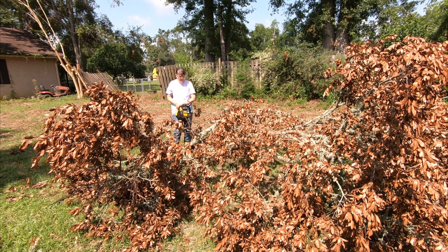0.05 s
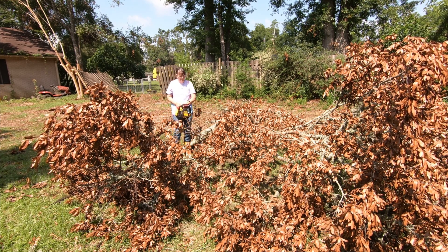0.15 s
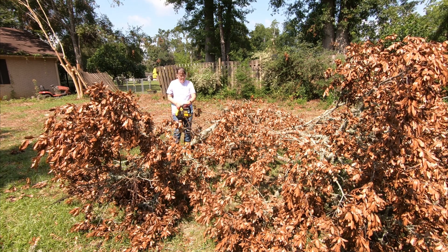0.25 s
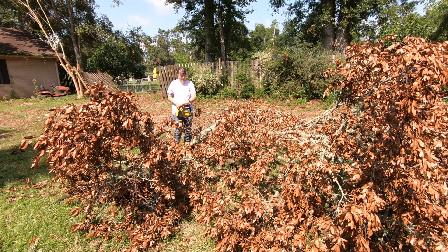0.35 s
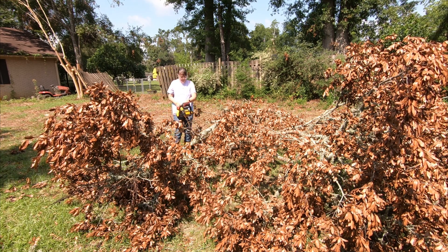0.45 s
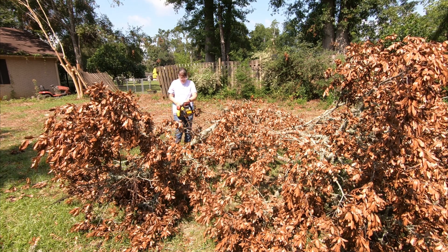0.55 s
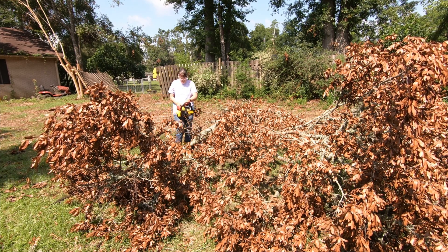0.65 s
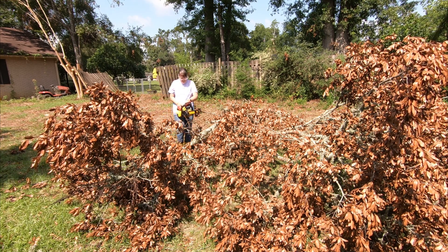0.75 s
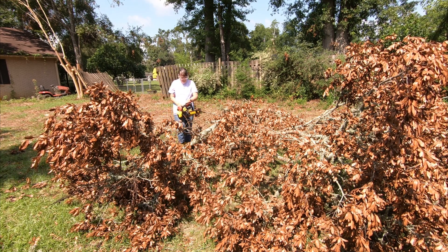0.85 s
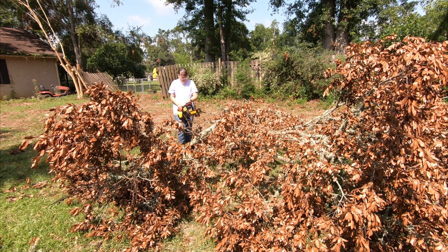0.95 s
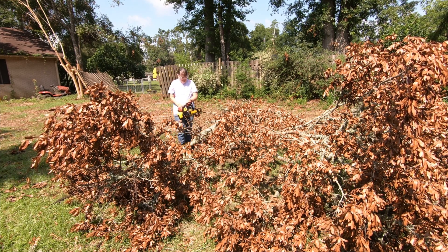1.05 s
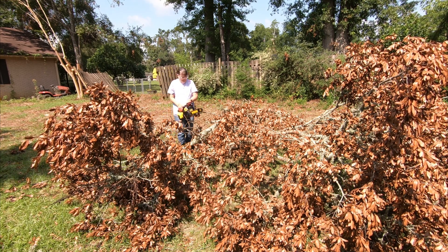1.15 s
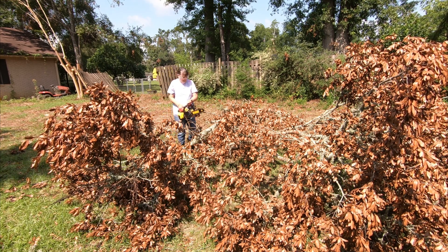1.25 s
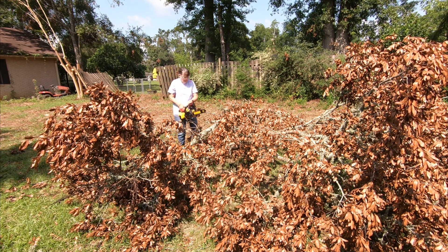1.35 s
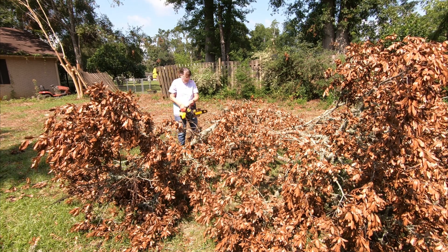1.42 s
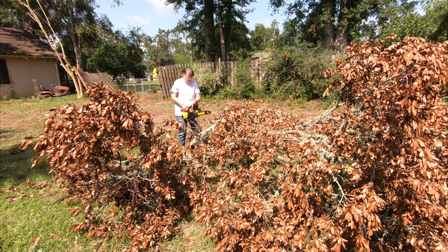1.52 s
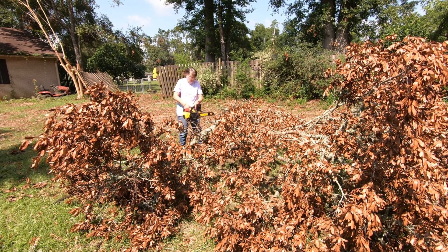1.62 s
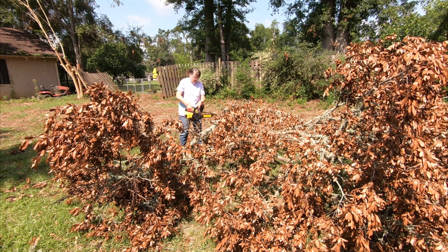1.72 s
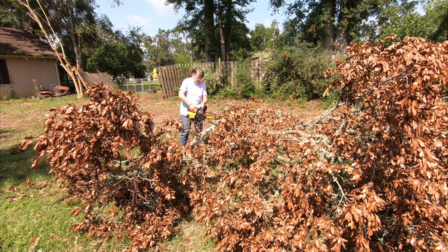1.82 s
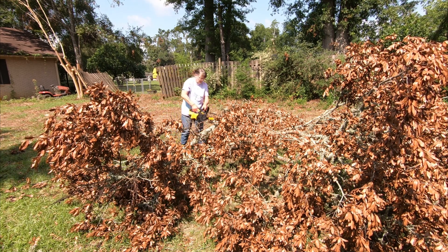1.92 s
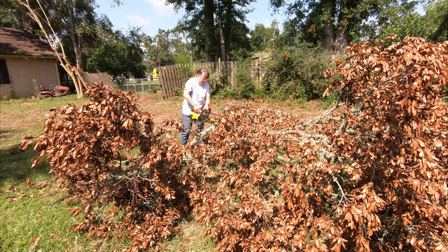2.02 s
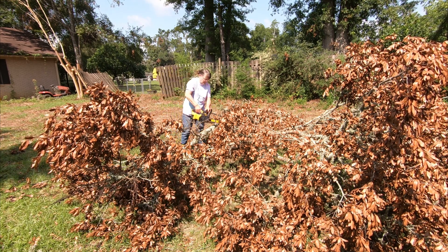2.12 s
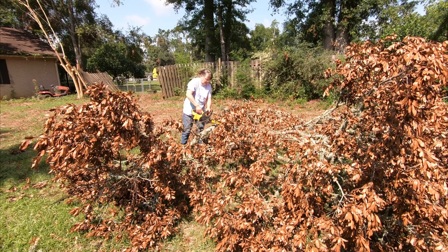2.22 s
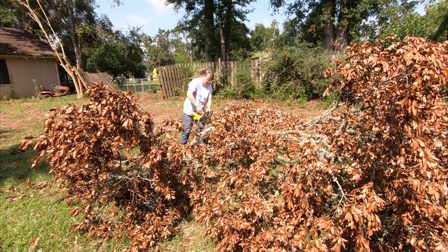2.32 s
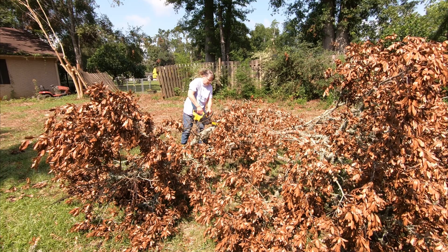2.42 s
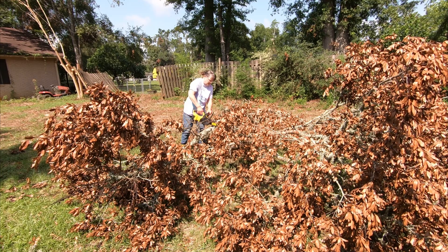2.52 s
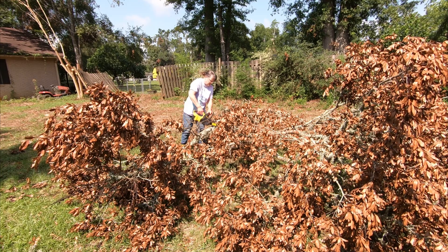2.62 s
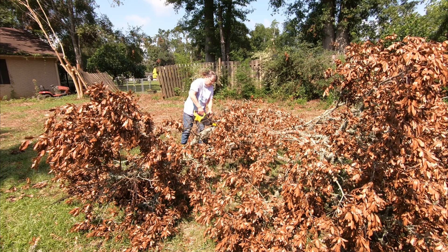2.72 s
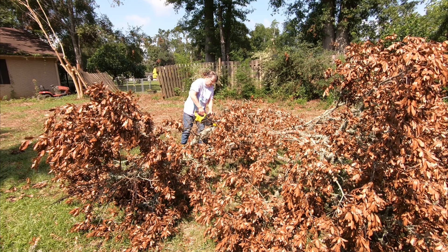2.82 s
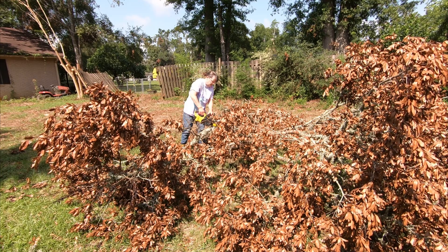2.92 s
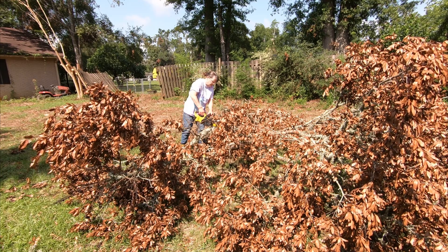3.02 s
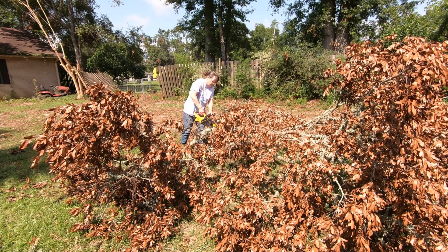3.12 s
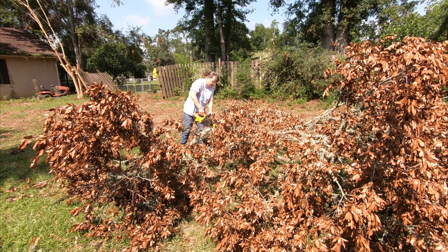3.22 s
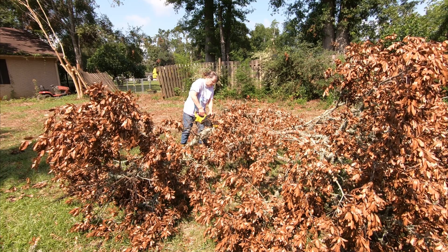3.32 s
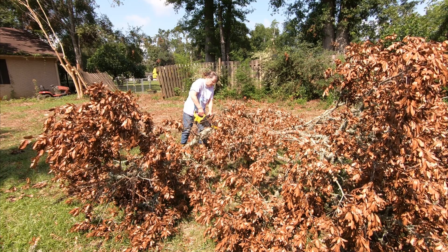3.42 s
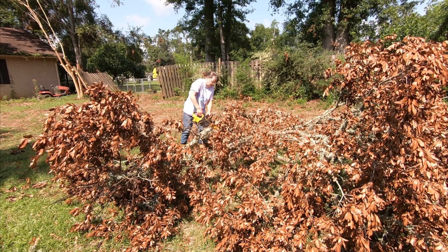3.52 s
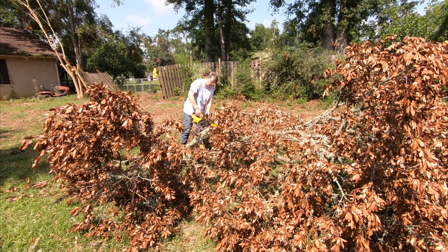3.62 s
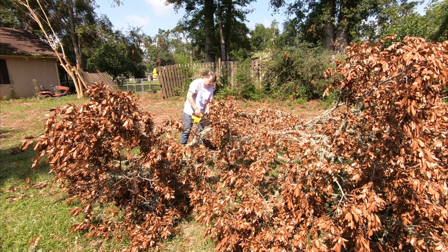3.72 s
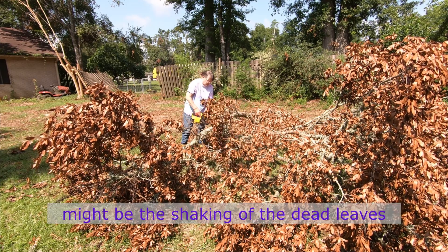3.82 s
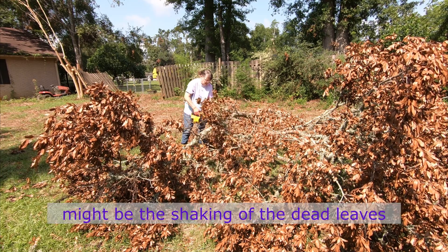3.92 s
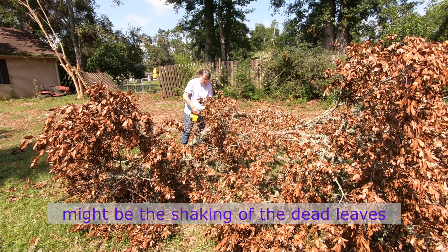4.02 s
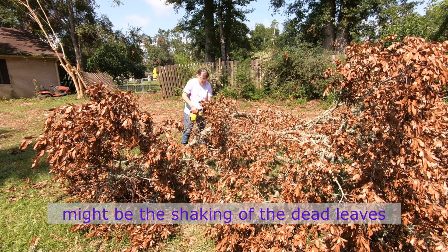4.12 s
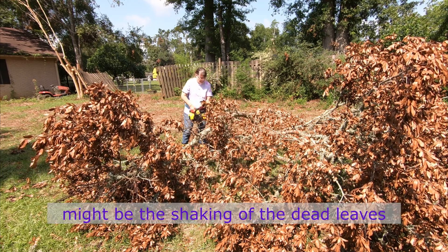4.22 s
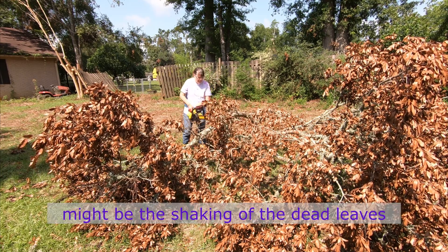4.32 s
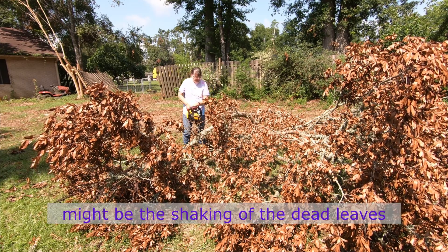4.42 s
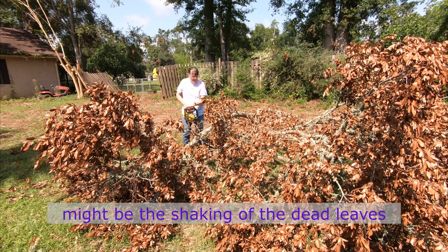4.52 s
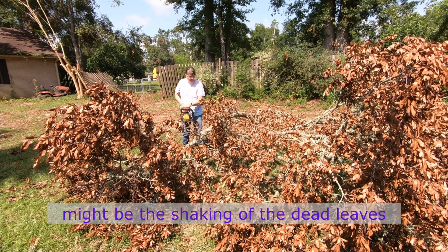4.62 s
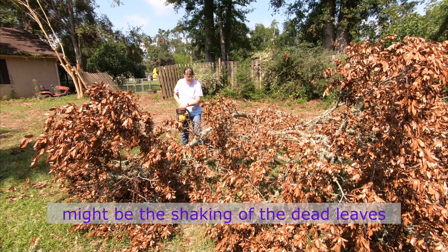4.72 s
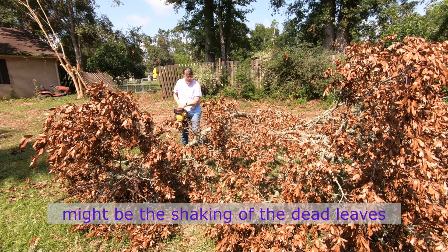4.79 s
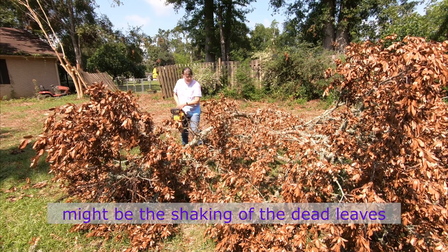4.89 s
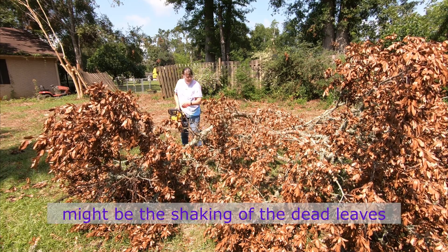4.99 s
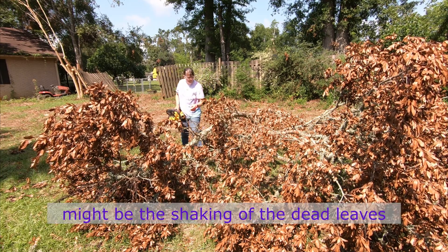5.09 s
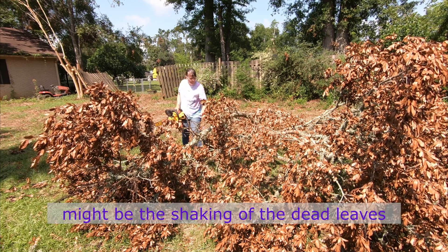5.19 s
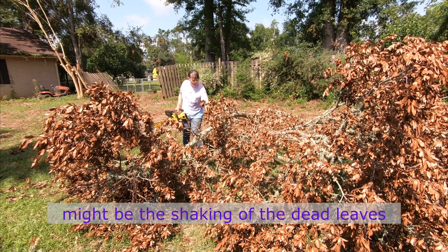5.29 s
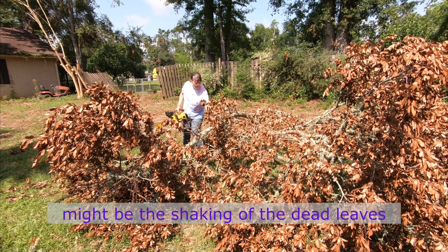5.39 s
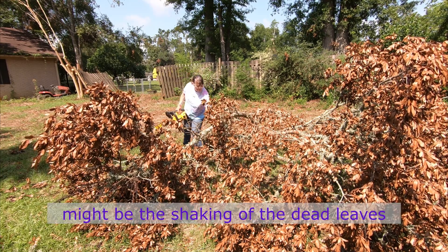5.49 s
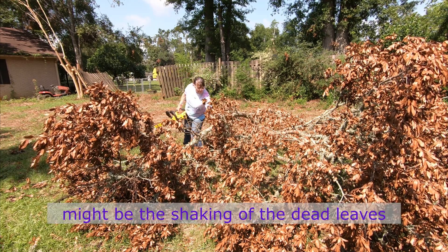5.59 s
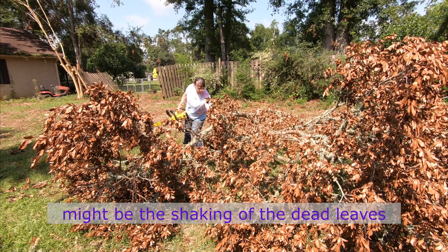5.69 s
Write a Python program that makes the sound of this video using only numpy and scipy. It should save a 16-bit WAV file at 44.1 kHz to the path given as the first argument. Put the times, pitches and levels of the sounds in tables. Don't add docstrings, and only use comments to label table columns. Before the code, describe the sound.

Outdoor yard with low far traffic rumble, soft treetop hiss, a high katydid buzz and thin cricket tones. Dry leaves rustle briefly, a trigger clicks, and an electric chainsaw jerks and whirs up to a rattling whine. Thin dead branches crack sharply as it cuts, then the brake scrapes it quickly down. A bird whistles afterwards with faint echoes. Stereo camera microphone at a moderate distance.

```python
import sys
import numpy as np
from scipy import signal
from scipy.fft import rfft, irfft, next_fast_len
from scipy.io import wavfile
from scipy.ndimage import uniform_filter1d, map_coordinates

SR = 44100
rng = np.random.default_rng(int(sys.argv[2]) if len(sys.argv) > 2 else 0)


def elevation(decibels):
    levels = np.asarray(decibels, float)
    return 10 ** (levels / 20)


def wrap_up_sound(samples):
    columns = np.atleast_2d(samples).T
    tamed = np.clip(columns, -1, 1)
    steps = np.round(tamed * 32767).astype(np.int16)
    wavfile.write(sys.argv[1], SR, steps)


N = 253575

# (frequency [Hz], likeness [0-1])
YARD_ALIKE = [(60, 0.98), (130, 1), (290, 0.87), (640, 0.78), (1400, 0.65), (3090, 0.72), (6780, 0.19),
              (14900, 0.39)]
# (frequency [Hz], likeness [0-1])
SAW_ALIKE = [(60, 0.88), (130, 0.91), (290, 0.92), (640, 1), (1400, 0.65), (3090, 0.95), (4700, 1),
             (6780, 0.61), (14900, 0.21)]
# (time [s], load [0-1])
LOAD = [(1.4, 0.54), (1.9, 0.74), (2.65, 0.01), (2.85, 0.71), (3.1, 0.99), (3.42, 0.88), (3.5, 0.36),
        (3.9, 0.34)]
# (time [s], drive-link rate [Hz])
BRAKE = [(3.69, 390), (3.79, 278), (3.9, 168), (4.0, 86), (4.11, 40), (4.24, 10)]
FULL_HZ = 386


def unit(x):
    return x / np.sqrt(np.mean(x ** 2) + 1e-20)


def along(points, hz):
    f, v = np.transpose(points)
    return np.interp(np.log(hz + 1), np.log(f + 1), v)


def curves(rows):
    s, *cols = np.transpose(rows)
    return [np.interp(np.arange(N) / SR, s, c) for c in cols]


def bumps(rows):
    t = np.arange(N) / SR
    return sum(height * np.exp(-2 * ((t - s) / width) ** 2) for s, height, width in rows)


def wobble(rate):
    knots = rng.standard_normal(int(N * rate / SR) + 4)
    return map_coordinates(knots, [np.arange(N) * rate / SR])


def filtered(x, response):
    m = next_fast_len(N + 8192)
    return irfft(rfft(x, m) * response(np.fft.rfftfreq(m, 1 / SR)), m)[..., :N]


def resonances(modes, f):
    return sum(elevation(db) * 1j * f * w / (c * c - f * f + 1j * f * w) for c, w, db in modes)


def ports(x, left_db, lead=((0, 0), (1, 0))):
    def half(hz):
        return elevation(along(left_db, hz) / 2) * np.exp(.5j * along(lead, hz))
    return filtered(x, lambda hz: np.array([half(hz), 1 / half(hz)]))


def rush(spectrum, alike, gate=1, patchy_db=0):
    z = signal.stft(gate * rng.standard_normal((2, N)), nperseg=256)[2]
    field = uniform_filter1d(rng.standard_normal(z.shape[1:]), size=3, axis=0)
    field = uniform_filter1d(field, size=8, axis=1)
    pair = signal.istft(z * elevation(patchy_db * unit(field)), nperseg=256)[1][:, :N]

    def colour(hz):
        turn = np.arccos(np.clip(along(alike, hz), 0, 1) ** 0.94) / 2
        return elevation(along(spectrum, hz)) * [np.cos(turn), np.sin(turn)]
    mid, side = filtered(pair, colour)
    return unit(np.array([mid + side, mid - side]))


def traffic():
    # (frequency [Hz], density [dB per Hz])
    rumble_band = [(12, -61), (20, -20), (45, -12.5), (58, 1.5), (75, -0.5), (108, -6), (130, -8),
                   (170, -23.5), (290, -120)]
    drone_band = [(71, -16), (120, 2), (204, -3.5), (242, -12.5), (270, -17), (350, -24.5), (590, -120)]
    canopy_band = [(1470, -35), (2500, -4), (3680, -9), (3870, -4), (4730, -4), (5030, -5.5), (5140, -5),
                   (6390, -14.5), (8080, -18.5), (9500, -7.5), (10700, -13), (11300, -58), (20900, -120)]
    roar_band = [(150, -38), (250, -13), (295, -12.5), (333, -15), (464, -13), (501, -12.5), (661, -3),
                 (900, -1), (2510, -22), (3500, -29.5), (4550, -59), (7700, -120)]
    # (time [s], level [dB])
    road = [(0, -0.5), (.5, 1), (1.4, 2), (2.4, 0), (3.2, 1.5), (4.2, 1), (5.15, 4), (5.75, 3)]
    # (time [s], level over the rumble [dB], half width [s])
    surges = [(0.05, 4, 0.47), (.63, 9, 0.041), (.86, 5.5, 0.09), (1.15, 7, 0.14), (1.88, 7, 0.18),
              (2.4, 5.5, 1), (4.05, 6, 0.16), (4.85, 2.5, 0.17), (5.3, 3, 0.48)]
    # (time [s], level [dB], half width [s])
    breeze = [
        (4.3, 0.5, 0.16),
        (5.2, -2.5, 1),
    ]
    near_db, = curves(road)
    rumble = elevation(-46.5 + bumps(surges) + 0.34 * wobble(6.3)) * rush(rumble_band, YARD_ALIKE)
    drone = elevation(-52 + 2.18 * near_db + 0.65 * wobble(5.0)) * rush(drone_band, YARD_ALIKE)
    hiss = elevation(-58.5 + bumps(breeze) + 0.23 * wobble(8.2)) * rush(canopy_band, YARD_ALIKE)
    roar = elevation(-47 + near_db + 0.048 * wobble(15)) * rush(roar_band, YARD_ALIKE)
    return rumble + drone + hiss + roar


def insects():
    # (frequency [Hz], density [dB per Hz])
    katydid = [(7500, -70), (8800, -39), (9600, -4), (10100, 9), (10350, 6), (10600, -23), (11100, -49),
               (13200, -60), (13600, -18), (13900, -5), (14300, -24), (14700, -72)]
    # (frequency [Hz], level [dB rms])
    crickets = [(4610, -72), (4762, -71), (4937, -85), (5200, -75)]
    t = np.arange(N) / SR
    stroke = (69 * t + 0.16 * wobble(2.36)) % 1
    teeth = np.sin(np.pi * stroke) ** 2 * (1 + .5 * np.cos(6 * np.pi * stroke))
    buzz = rush(katydid, [(9000, 0.18)], (.45 + teeth) * elevation(wobble(5)))
    ring = 0
    for hz, db in crickets:
        ring = ring + elevation(db + 2.3 * wobble(7.4)) * np.sin(2 * np.pi * hz * t + 1.6 * wobble(40))
    return elevation(-63.5) * buzz + ring


def leaves():
    # (time [s], length [s], level [dB rms], centre [Hz])
    puffs = [(0.018, 0.047, -54.5, 2500), (0.726, 0.036, -65, 7040), (0.982, 0.098, -58, 4020),
             (4.17, 0.51, -64, 5630), (4.51, 0.13, -62, 4560), (5.153, 0.12, -53.5, 4260),
             (5.676, 0.17, -59, 4600)]
    t, out = np.arange(N) / SR, 0
    for s, length, db, hz in puffs:
        band = [(hz / 3, -30), (hz * 0.69, -3), (hz * 1.2, 0), (hz * 2.1, -30), (hz * 2.1, -90)]
        grains = rush(band, YARD_ALIKE, elevation(3 * wobble(250)))
        out = out + elevation(db) * np.exp(-((t - s) / length * 2) ** 2) * grains
    return out


def ticks():
    # (time [s], peak [dB], centre [Hz], t60 [s])
    clicks = [(0.9951, -42, 4610, 0.011), (1.1882, -43, 3480, 0.014), (1.4065, -19.5, 3540, 0.005),
              (1.407, -26, 4730, 0.0079), (1.4068, -39, 8300, 0.0059), (1.4445, -31, 3600, 0.012),
              (1.445, -34, 4740, .01), (1.483, -32, 3160, 0.015), (1.488, -31, 990, 0.014),
              (1.6217, -38, 2770, 0.0074), (4.022, -26, 4070, 0.0092), (4.066, -34, 5330, 0.011),
              (4.09, -39, 3550, 0.027), (4.135, -43, 4040, 0.011), (3.829, -16, 3770, 0.011),
              (3.888, -27, 5030, .008), (3.929, -23, 3000, .008), (4.0805, -33, 705, 0.02),
              (4.081, -34, 1420, .025), (4.555, -42, 4960, .012), (4.5855, -52, 4550, .01),
              (4.6254, -43, 5010, 0.011), (4.6787, -49, 5000, .01), (4.9302, -50, 4390, .01),
              (5.636, -47, 4560, .01), (5.1547, -52, 2560, 0.011)]
    # (time [s], peak [dB], centre [Hz],
    # t60 [s])
    snaps = [(2.327, -14, 3520, .01), (2.692, -10.5, 687.3, 0.011), (2.809, -31, 1100, 0.023),
             (2.907, -19, 890, 0.023), (2.907, -12, 3800, 0.0089), (2.974, -15.5, 1203, 0.029),
             (2.976, -18, 2275, 0.017), (2.982, -20, 714, .02), (3.029, -17, 1150, 0.021),
             (3.059, -13, 737, 0.02), (3.061, -18, 1950, 0.022), (3.099, -10.5, 1160, 0.013),
             (3.119, -11.5, 800, 0.015), (3.167, -18, 1301, 0.023), (3.27, -18, 1742, 0.022),
             (3.308, -14.5, 874, 0.025), (3.308, -9, 3300, 0.011), (3.344, -11, 1100, 0.014),
             (3.354, -20, 3450, 0.0095), (3.363, -20, 764, 0.037), (3.363, -11.5, 3940, 0.017),
             (3.383, -10.5, 730, 0.02), (3.437, -14, 1360, 0.024), (3.594, -10, 4596, 0.0086),
             (4.083, -39, 1957, 0.024)]
    out, t = np.zeros(N + SR), np.arange(SR // 20) / SR
    for s, db, hz, t60 in clicks + snaps:
        crack = .6 * np.sin(2 * np.pi * hz * t) + .55 * rng.standard_normal(len(t))
        blow = elevation(db + 4 - 60 * t / t60) * (1 - np.exp(-t / .001)) * crack
        band = signal.butter(3, [hz * .8, hz * 1.7], "band", fs=SR)
        out[round(s * SR):][:len(t)] += signal.lfilter(*band, blow)
    return out[:N]


def link_rate():
    # (time [s], drive-link rate [Hz])
    spin_up = [(1.44, 12), (1.61, 66), (1.776, 127.5), (1.902, 187), (2.05, 260), (2.18, 319),
               (2.34, 386.5)]
    # (time [s], sag [Hz], half width [s])
    bogs = [(3.0, 4, .05), (3.12, 8, .07), (3.36, 13, .065)]
    t = np.arange(N) / SR
    freed = 5 * np.clip((t - 3.47) / .06 + .5, 0, 1)
    hunting = 1.8 * curves(LOAD)[0] * wobble(rate=14)
    driven = curves(spin_up)[0] + freed - bumps(bogs) + hunting
    return np.minimum(driven, curves(BRAKE)[0])


def motor(turns, shaft_hz, load, torque_db, braking):
    # (multiple, free level [dB rms], change under load [dB], change while speed ramps [dB])
    orders = [(3, -41.5, 0.5, 1.5), (6, -39, 2, 2), (9, -32.5, -7, 0), (10, -41.5, -1, -2.5),
              (12, -51, 8, 8), (15, -51.5, 8.5, 6.5), (18, -38, -12, 1), (21, -48, 4.5, 6),
              (24, -72, -7, -16), (27, -41.5, 4, -26), (30, -49, 9, 3), (40, -46, 6.5, -9)]
    # (frequency [Hz], width [Hz], level [dB])
    casing = [(592, 142, 16.5), (1342, 68, 5.5), (1770, 160, 3)]
    # (frequency [Hz], width [Hz], level [dB rms])
    whine_housing = [(1400, 200, -40), (1700, 240, -31), (1900, 260, -36), (2080, 300, -32),
                     (2350, 260, -40), (2700, 400, -46), (3070, 400, -37), (3500, 500, -46),
                     (3900, 400, -40), (4300, 400, -38), (4630, 340, -46)]
    # (frequency [Hz], width [Hz], level [dB])
    housing_rings = [(1410, 29, -31), (1657, 16, -22.5), (2080, 30, -31.5), (2310, 32, -23),
                     (2990, 63, -29)]
    out = np.zeros(N)
    ramp = np.clip(np.abs(uniform_filter1d(np.gradient(shaft_hz), size=2000)) * SR / 120, 0, 1)
    for order, db, load_db, ramp_db in orders:
        hz = order * shaft_hz
        lift = 1 + sum(elevation(g) / (1 + ((hz - c) / w * 2) ** 2) for c, w, g in casing)
        radiated = 1 / (1 + (330 / hz) ** 5)
        shake = (.2 + .6 * load) * (1 - .6 * ramp) * (1 + order / 20) * wobble(45)
        level = elevation(db + load_db * load + ramp_db * ramp + torque_db + 2.3 * load * wobble(30.06))
        out += np.sqrt(2) * level * lift * radiated * np.sin(2 * np.pi * order * turns + shake)

    slot_hz, slot_phase = 36 * shaft_hz, 72 * np.pi * turns
    brake_db = -15 * braking
    housing = sum(elevation(g) / (1 + ((slot_hz - c) / w * 2) ** 2) ** 2 for c, w, g in whine_housing)
    whine = np.sin(slot_phase + (1.2 - .6 * ramp) * wobble(70))
    whine = housing * elevation(brake_db + 2.6 * wobble(40)) * whine
    rough = elevation(brake_db) * np.sin(slot_phase + 1.3 * wobble(500))
    return out + np.sqrt(2) * whine + filtered(rough, lambda f: resonances(housing_rings, f))


def chain(turns, load, slack):
    links = 3 * turns
    force = elevation((1.5 + 3.2 * slack) * rng.standard_normal(4000)[links.astype(int)])
    slap = 2.6 + force * np.exp(-2.5 * (links % 1))
    runout = 1 + 0.084 * np.cos(2 * np.pi * turns)
    chatter = elevation(load * (1.4 * wobble(45) + 2.1 * wobble(150)))
    return slap * runout * chatter


def side_cover(gate):
    # (frequency [Hz], width [Hz], level [dB])
    cover_modes = [(1430, 120, 0.5), (1703, 150, 3), (2020, 190, 1), (2223, 220, 2.5), (2713, 190, -2),
                   (3300, 91, -1.5), (3930, 110, -2.5), (4690, 200, -8), (5110, 260, -2)]
    shaken = rush([(900, 0)], SAW_ALIKE, gate, patchy_db=-3.0)
    return unit(filtered(shaken, lambda f: resonances(cover_modes, f) ** 2 / (1 + (f / 5900) ** 10)))


def guide_bar(gate):
    # (frequency [Hz], density [dB per Hz])
    bar_band = [(880, -10.5), (1500, -9), (1820, 3.5), (2060, -9.5), (2370, 2), (2820, -4), (3090, 1.5),
                (4050, -1.5), (4690, 0.5), (6520, -11.5), (7000, -21), (9100, -19), (15400, -120)]
    return rush(bar_band, SAW_ALIKE, gate, patchy_db=-0.34)


def saw_body(gate):
    # (frequency [Hz], density [dB per Hz])
    body_band = [(240, -44), (410, -14.5), (430, -14.5), (486, -3.5), (699, -4), (769, -7.5), (830, -15),
                 (1000, -28), (2000, -120)]
    return rush(body_band, SAW_ALIKE, gate, patchy_db=0.5)


def side_panel(gate):
    # (frequency [Hz], density [dB per Hz])
    panel_band = [(500, -90), (740, -23), (835, -1.5), (983, -6.5), (1170, 0.5), (1400, -1), (2100, -15),
                  (2730, -66), (4620, -120)]
    return rush(panel_band, SAW_ALIKE, gate, patchy_db=-0.3)


def flying_chips(gate):
    # (frequency [Hz], density [dB per Hz])
    chip_band = [(5000, -33), (6000, -37), (6800, -8), (7400, -2.5), (8200, -6.5), (8900, -1), (9800, -0.5),
                 (10600, -8), (12000, -13.5), (14000, -20.5), (15000, -30), (15600, -90)]
    return rush(chip_band, SAW_ALIKE, gate ** 0.5, patchy_db=1.0)


def brake_band(gate):
    # (frequency [Hz], density [dB per Hz])
    scrape_band = [(800, -41.5), (1300, -3), (1550, -2), (1850, -4.5), (2100, -23), (2550, -5), (3200, -39),
                   (4000, -120)]
    return rush(scrape_band, SAW_ALIKE, gate * elevation(1.7 * wobble(120)), patchy_db=-1.5)


def saw():
    # (time [s], level over the rattle [dB], decay [s])
    jerks = [(1.468, 7.5, 0.0093), (1.483, 2, .01), (1.51, 0, 0.021), (1.539, 3, 0.0046),
             (1.572, -5, 0.0089), (1.608, 4, 0.019), (1.62, 6, 0.0053), (1.658, 3.5, 0.062),
             (1.753, 2, .02), (1.79, 2, 0.071)]
    t, link_hz = np.arange(N) / SR, link_rate()
    load = np.clip(curves(LOAD)[0], 0, 1.5)
    decades = np.log10(link_hz / FULL_HZ)
    braking = np.clip((t - BRAKE[0][0]) / 0.044, 0, 1)
    running = np.clip(np.minimum((t - 1.44) / 0.007, (4.26 - t) / 0.11), 0, 1)
    fast = (link_hz / FULL_HZ) ** 4
    cut = load * fast

    def growth(driven, braked):
        return (driven + (braked - driven) * braking) * decades

    turns = np.cumsum(link_hz) / SR / 3
    slack = (0.3 + braking) * np.clip(1 - link_hz / FULL_HZ, 0, 1)
    gate = chain(turns, load, slack)
    lines = running * motor(turns, link_hz / 3, load, -2.03 + growth(38, 49), braking)

    jerk_db = sum(db * (t > s) * np.exp(-np.abs(t - s) / decay) for s, db, decay in jerks)
    unsteady_db = -0.78 * braking * decades * wobble(30.05)
    rattle = running * elevation(-29.5 + growth(9.9, 22.2) + 2.5 * cut + jerk_db + unsteady_db)

    ring_db = -2 - 4.5 * fast - 6 * cut - 4.5 * braking
    free = np.sqrt(np.clip(1 - 0.23 * elevation(2 * ring_db), .05, 1))
    body_db = -7.4 + 0.75 * decades + 2 * braking * (1 - 0.52 * decades)
    parts = elevation(ring_db) * side_cover(gate)
    parts += free * elevation(-0.55 + growth(10.6, 2.6)) * guide_bar(gate)
    parts += elevation(body_db) * saw_body(gate)
    parts += elevation(-4.5 + growth(9.7, 1.8)) * side_panel(gate)
    parts += elevation(-10.5 + growth(19, 4.2)) * flying_chips(gate)
    parts += braking * elevation(-2 - 2.5 * decades) * brake_band(gate)
    return lines + rattle * parts


def bird():
    # (time from start [s], pitch [re note], level [dB re note])
    flick = [(0, 1.2, -9), (.006, 1.13, -4), (.013, .98, -1), (.019, 0.85, -4)]
    hook = [(0, 1.13, -6), (.005, 1.12, -2), (.013, 1.0, -0.5), (.029, .925, -3), (.06, .9, -5),
            (.072, 0.85, -13), (.104, 0.76, -12)]
    slide = [(0, 1.075, -8), (.005, 1.085, -3), (.018, .99, -1), (.035, .925, -3), (.05, .89, -9),
             (.068, .865, -14), (.105, 0.715, -13)]
    whistle = [(0, .87, -12), (.017, .995, -4), (.035, 1, 0), (.055, .995, -2), (.07, .99, -7),
               (.095, .982, -19)]
    warble = [(0, 1.08, -8), (.008, 1.1, -1.5), (.015, 1, -5), (.022, .84, -1), (.029, .96, -4),
              (.036, .87, -2), (.05, .85, -8), (.062, .76, -10)]
    # (time [s], pitch [Hz], level [dB rms], stretch [ratio])
    flicks = [(4.061, 2600, -45, .7), (4.406, 2760, -44.5, 1.05), (5.08, 2650, -49.5, 1),
              (5.293, 2300, -53, .6), (5.574, 2600, -45, .8)]
    hooks = [(5.102, 2660, -46, 0.95), (5.592, 2630, -42.5, 0.9)]
    slides = [(4.077, 2570, -49, 0.99), (4.426, 2610, -43.5, 1.0)]
    whistles = [(4.21, 2320, -49, 1.27), (4.562, 2460, -47.5, 0.86)]
    warbles = [(5.214, 2670, -48, 0.99)]
    # (delay [s], level [dB])
    walls = [(.074, -13), (.081, -18), (.096, -24)]
    phrases = ((flick, flicks), (hook, hooks), (slide, slides), (whistle, whistles), (warble, warbles))
    song = np.zeros(N + SR)
    for shape, sung in phrases:
        at, pitch, level = np.transpose(shape)
        for s, hz, db, stretch in sung:
            t = np.arange(0, at[-1] * stretch, 1 / SR)
            ends = np.clip(np.minimum(t, t[-1] - t) / 0.0023, 0, 1)
            phase = 2 * np.pi * hz * np.cumsum(np.interp(t / stretch, at, pitch)) / SR
            loudness = np.sqrt(2) * elevation(db + np.interp(t / stretch, at, level))
            song[round(s * SR):][:len(t)] += loudness * ends * np.sin(phase)
    song[:N] *= elevation(0.64 * wobble(60))
    smear_t60 = 0.34
    tail = rng.standard_normal(SR // 2) * elevation(-60 * np.arange(SR // 2) / SR / smear_t60)
    song += elevation(-11) * signal.fftconvolve(song, tail / np.linalg.norm(tail))[:len(song)]

    def echoes(hz):
        return 1 + sum(elevation(db) * np.exp(-2j * np.pi * hz * s) for s, db in walls)
    return filtered(song[:N], echoes)


def scene():
    # (frequency [Hz], left minus right [dB])
    yard_left = [(60, 0.0), (110, 0.5), (200, 0.5), (380, 1), (700, 4.5), (1290, 6), (2370, 2), (4380, -4),
                 (8080, -4), (14900, -4.5)]
    saw_left = [(60, -1), (110, 4), (200, -1), (380, 2.5), (700, 3.5), (1290, 5), (2370, 2), (4380, -3),
                (8080, 2), (14900, 2)]
    # (frequency [Hz], phase by which left leads [rad])
    saw_turn = [(0, 0), (860, 0.2), (1120, -0.5), (2410, -0.5), (5080, 0.5), (5680, 1.7), (7150, 0.7),
                (8270, 5.6), (9300, 7.0), (12300, 6.2), (12800, 6.7), (13400, 4.7), (13600, 5.8),
                (15100, 6.1)]
    yard = traffic() + insects() + leaves() + bird()
    return ports(yard, yard_left) + ports(ticks() + saw(), saw_left, saw_turn)


def roll_off(x):
    return signal.sosfilt(signal.butter(12, 15520, fs=SR, output="sos"), x)


def record(dry):
    mix = filtered(dry, lambda hz: 1 / (1 + (hz / 15300) ** 40))
    return roll_off(mix)


dry = scene()
out = record(dry)
wrap_up_sound(out)
```